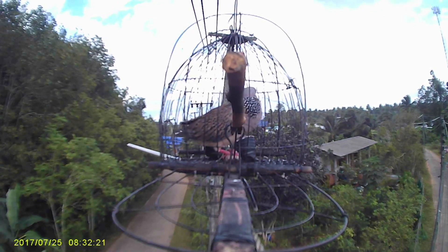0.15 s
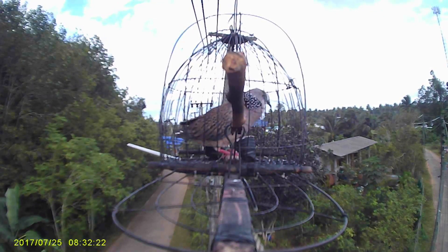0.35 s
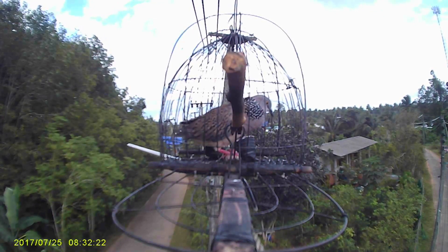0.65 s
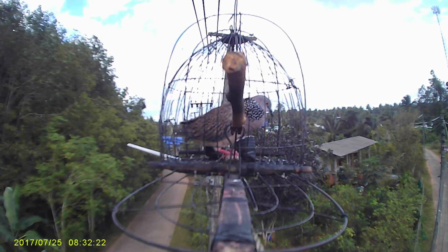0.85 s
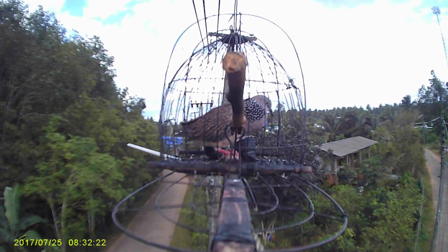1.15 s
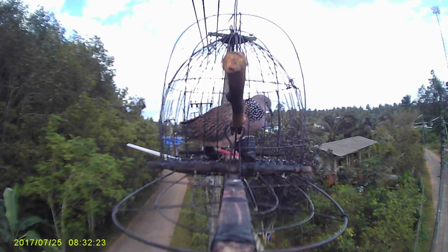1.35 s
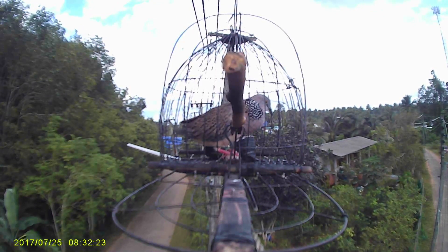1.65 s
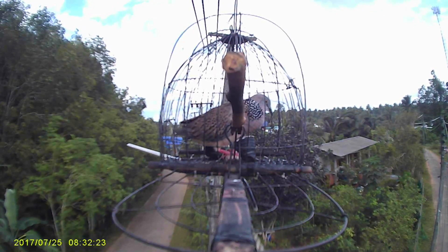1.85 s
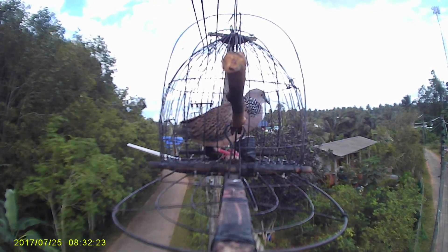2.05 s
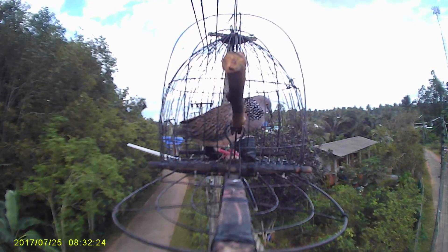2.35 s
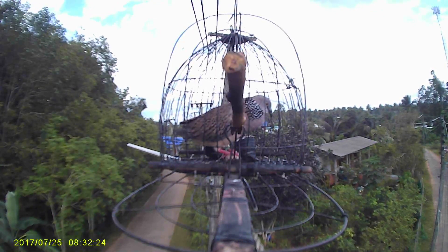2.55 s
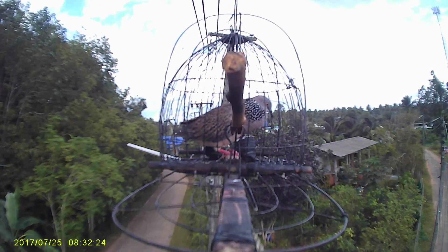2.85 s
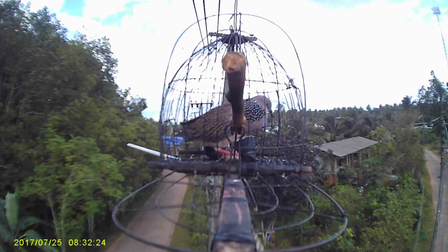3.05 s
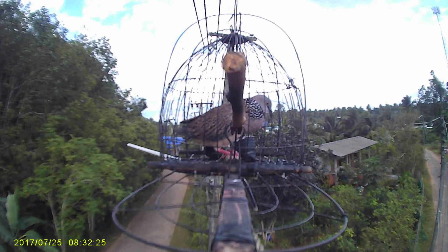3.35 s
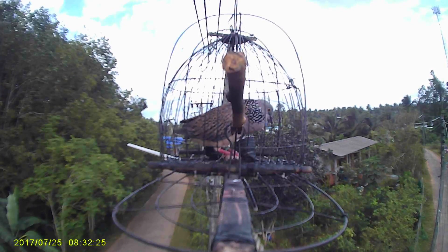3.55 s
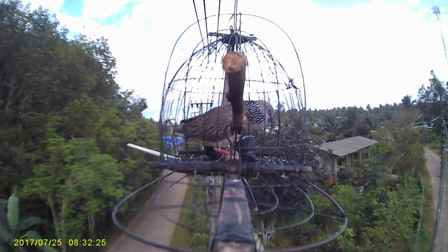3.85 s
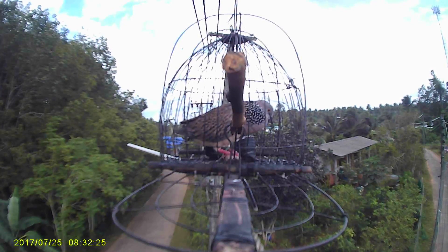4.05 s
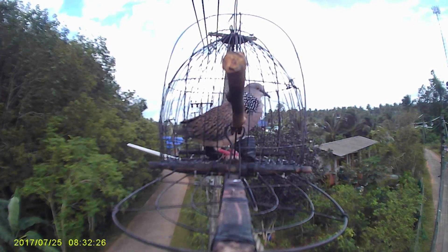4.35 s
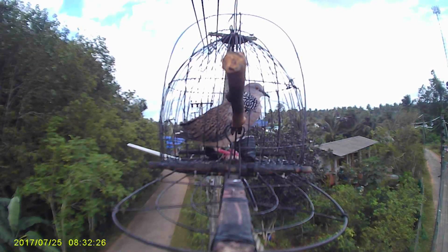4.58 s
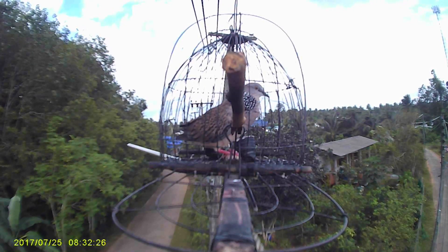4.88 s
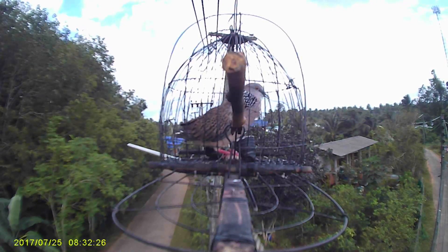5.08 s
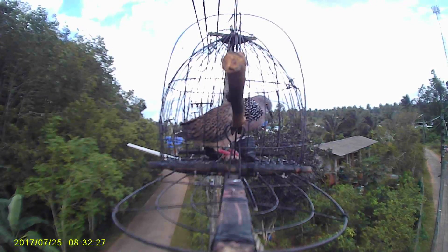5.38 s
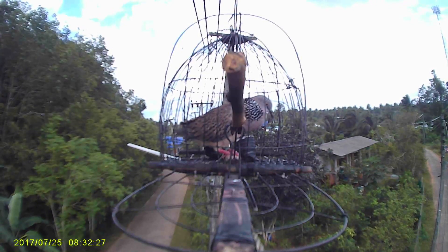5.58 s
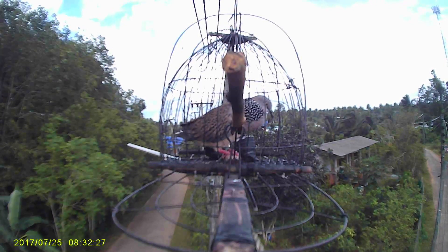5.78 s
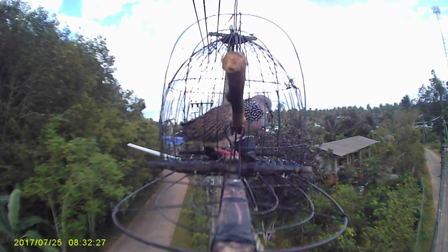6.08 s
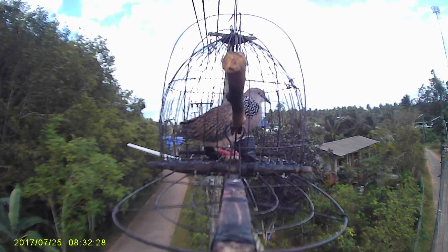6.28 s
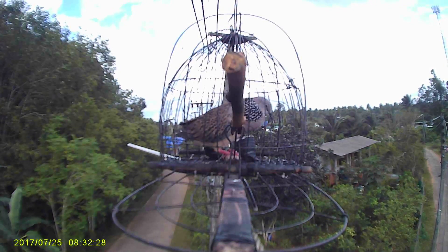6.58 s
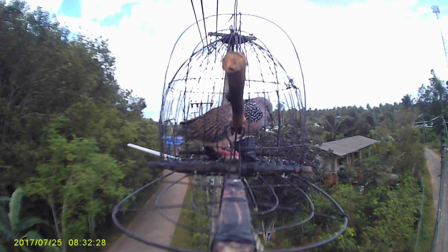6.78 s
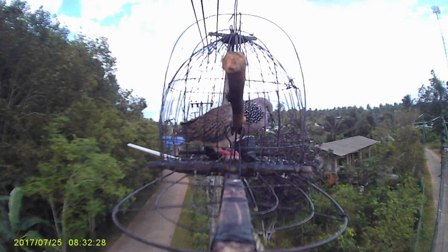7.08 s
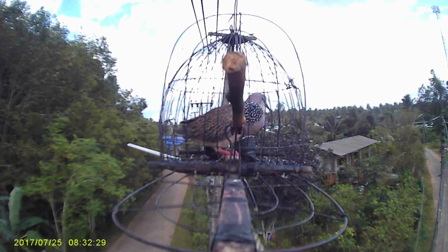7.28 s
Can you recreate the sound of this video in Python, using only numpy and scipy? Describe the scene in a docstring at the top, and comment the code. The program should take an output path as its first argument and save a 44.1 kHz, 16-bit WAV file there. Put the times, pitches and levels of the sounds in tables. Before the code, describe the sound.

A dove near the microphone coos again and again: a quick dipping double note, then a longer purring coo, mellow and low with a fluttering throb. Low wind rumble opens the scene, eases, swells around three seconds, then buffets almost constantly from nearly five seconds on. Behind are a steady outdoor hiss, a few faint bird whistles and a very thin high whine.

```python
"""Dove cooing in gusty wind

A spotted dove coos close by: a dipping double note, then a long purring one, with a faint echo.
Its near-pure tone flutters where the voice breaks between a low and a high register.
Gusts, made of shaped noise, buffet the microphone harder later on, with brief moans in a strong one.
Faint whistled calls of other birds, a steady outdoor hiss and a thin electronic whine lie behind."""
import sys
import numpy as np
from scipy import signal
from scipy.fft import rfft, irfft, next_fast_len
from scipy.io import wavfile
from scipy.ndimage import uniform_filter1d, map_coordinates

SR = 44100
rng = np.random.default_rng(int(sys.argv[2]) if len(sys.argv) > 2 else 0)


def int16_out(signal):
    """Quantize to a 16-bit WAV file."""
    q = np.round(np.clip(np.atleast_2d(signal).T, -1, 1) * 32767)
    wavfile.write(sys.argv[1], SR, q.astype(np.int16))


N = 327663
TIME = np.arange(N) / SR


def amp(db):
    """Decibels to gain."""
    return 10 ** (np.asarray(db) / 20)


def unit(x):
    """Scales to rms 1."""
    return x / np.sqrt(np.mean(x ** 2) + 1e-20)


def add(mix, start, sound):
    """Mixes a sound in at a time in seconds, which may lie before the start of the scene."""
    at = round(start * SR)
    sound = sound[max(-at, 0):]
    part = mix[max(at, 0):][:len(sound)]
    part += sound[:len(part)]


def drift(count, hz):
    """Smooth random wander up to about hz, cut from a scene-long one of rms 1."""
    f = np.fft.rfftfreq(N, 1 / SR)
    smooth = rfft(rng.standard_normal(N)) * np.exp(-(f / hz) ** 2)
    return unit(irfft(smooth, N))[:count]


def coloured(x, spectrum):
    """Filters by a spectrum given as (Hz, dB) points."""
    hz, db = np.transpose(spectrum)
    size = next_fast_len(len(x) + 2048)
    log_hz = np.log(np.fft.rfftfreq(size, 1 / SR) + 1)
    gain = amp(np.interp(log_hz, np.log(hz), db, right=-120))
    return irfft(rfft(x, size) * gain, size)[:len(x)]


def noise(spectrum):
    """Coloured noise of rms 1."""
    return unit(coloured(rng.standard_normal(N), spectrum))


def steadied(x, seconds):
    """Evens out swells slower than the given time."""
    power = uniform_filter1d(x ** 2, int(seconds * SR))
    return x / np.sqrt(abs(power) + 1e-6)


def gate(t, start, end, edge_s):
    """1 from start to end, 0 outside, with smooth edges centred on those times."""
    ramp = np.minimum(t - start, end - t) / edge_s + .5
    return np.sin(np.pi / 2 * np.clip(ramp, 0, 1)) ** 2


def dove(echo_db=-29, echo_t60=1.0):
    """The double and purring notes, and their faint scatter from the trees as a decaying noise echo."""
    # Each row: start in s, length in s, sag between the syllables in dB, high-register time of the
    # first syllable in s and of the second in s, effort of the second in dB, mean flutters per s.
    double_notes = [(.772, 0.23, 11.5, 0.048, 0.031, -15, 74), (2.618, .27, 17, 0.049, .048, -14.5, 84),
                    (3.854, 0.19, 10, 0.031, 0, -16, 91), (5.535, .266, 17, .042, 0.0351, -15, 88.5),
                    (6.865, .199, 8, 0.036, 0.0023, -17, 82)]
    # Each row: start in s, length in s, level in dB before the arch, reference pitch in Hz at the top,
    # delay before the voice steadies in s, length of the steady part in s, mean flutters per s.
    purrs = [(-.21, .41, -16.3, 666, 0.13, 0.14, 59.4), (1.128, 0.39, -16.5, 662.4, .112, 0.14, 57.4),
             (3.026, .404, -16.5, 659.6, .176, .016, 60), (4.174, 0.36, -17.5, 652.6, 0.078, 0.0557, 60),
             (5.946, 0.38, -17.5, 658.7, .148, .11, 58.24), (7.196, 0.41, -18, 665, 0.067, 0.098, 67.6)]
    voice = np.zeros(N)
    for start, *note in double_notes:
        add(voice, start, double_note(*note))
    for start, *note in purrs:
        add(voice, start, purr(start, *note))
    t = TIME[:SR]
    tail = rng.standard_normal(len(t)) * amp(-60 * t / echo_t60)
    echo = signal.fftconvolve(voice, tail / np.linalg.norm(tail))[:N]
    return voice + amp(echo_db) * echo


def double_note(length, sag_db, first_s, second_s, second_db, flutter_rate, up_s=0.01353, let_go_s=0.01055):
    """A hoot in the high register, a low murmur, and a swell that may jump up again; pitch follows effort."""
    hoot_db, quiet_db = -16, -36  # effort of the first syllable, and at the note's two ends
    hoot_s, sag_s = .064, 0.0113  # how long the hoot is held, and the time constant of the sag
    swell_s, second_share = 0.0713, .2  # rise time, and the share of the note held at the second's effort
    onset_s, stop_s = 0.014, .016
    low_hz, hz_per_db = 523, 6.5  # low register: pitch at the hoot's effort, and its rise with effort
    jump_hz, jump_s, high_loss_db = 146.3, .028, 3  # high register: how far up, how fast, how much softer
    second_jump = 0.86  # share of that jump which the second syllable makes
    flip_db = 2  # lift while crossing between the registers
    low_flutter, high_flutter, flutter_per_db = 0.84, 0.048, 0.1  # depths; the low one grows with effort

    t = np.arange(0, length, 1 / SR)
    sag = 1 - np.exp(-np.maximum(t - hoot_s, 0) / sag_s)
    swell = np.clip(1 + (t - length * (1 - second_share)) / swell_s, 0, 1)
    effort_db = (hoot_db - sag_db * sag) * (1 - swell) + second_db * swell
    ends = np.clip(np.minimum(t / onset_s, (length - t) / stop_s), 0, 1)
    effort_db = quiet_db + (effort_db - quiet_db) * ends

    high = gate(t, up_s, up_s + first_s, jump_s)  # 0 in the low register, 1 in the high one
    if second_s > 0:
        second_end = length - let_go_s
        high = high + second_jump * gate(t, second_end - second_s, second_end, jump_s)

    extra_db = effort_db - hoot_db
    hz = low_hz + hz_per_db * extra_db + jump_hz * high
    level_db = effort_db - high_loss_db * high + flip_db * np.sin(np.pi * high) ** 2
    low_depth = low_flutter + flutter_per_db * extra_db
    depth = high_flutter + (low_depth - high_flutter) * (1 - high) ** 2
    return coo(hz, level_db, depth, flutter_rate)


def purr(start, length, db, top_hz, delay_s, steady_s, flutter_rate, release_s=0.023, release_db=7):
    """A long arch that flutters, holds steady for a while, perhaps cracks, and flutters again as it sinks."""
    # The arch all purrs share. Each row: time into the note in s, pitch as a share of the top,
    # level in dB, flutter depth (0 none, 1 full).
    purr_arch = [(0, 0.742, -9.5, 0.19), (.015, .85, -2.5, 0.71), (.036, 0.95, 0.3, 1.1),
                 (.09, .99, -0.5, 0.92), (.135, 0.96, -0.5, 0.88), (0.202, .92, 0.5, 0.6),
                 (0.254, .835, 2.5, 0.73), (.3, .765, -1.5, 0.53), (.36, .69, -10, 0.08),
                 (.4, 0.585, -16, 0.25)]
    # The voice flips briefly to the other register.
    # Each row: centre time in the scene in s, length in s, pitch step in Hz.
    cracks = [(.02, 0.021, -89), (1.329, 0.022, -100), (3.251, 0.017, 26), (3.269, 0.019, -35),
              (3.293, 0.021, 33.5), (4.404, 0.027, 42), (6.109, 0.023, -89)]
    crack_db_per_hz = 0.0373  # the low register is louder
    hold_up = .6  # settling in the high register holds back this share of the fall in pitch
    settle_s, steady_depth = .014, .14  # edge time, and flutter depth while steady

    t = np.arange(0, length, 1 / SR)
    s, *columns = np.transpose(purr_arch)
    share, arch_db, depth = (np.interp(t, s, c) for c in columns)
    steady = gate(t, delay_s, delay_s + steady_s, settle_s)
    hz = top_hz * (share + hold_up * (1 - share) * steady)
    level_db = db + arch_db - release_db * np.clip(1 - (length - t) / release_s, 0, 1)
    for at, crack_s, step_hz in cracks:
        flip = gate(start + t, at - crack_s / 2, at + crack_s / 2, settle_s)
        hz = hz + step_hz * flip
        level_db = level_db - crack_db_per_hz * step_hz * flip
        steady = np.maximum(steady, flip)
    return coo(hz, level_db, depth + (steady_depth - depth) * steady, flutter_rate)


def coo(hz, level_db, depth, flutter_rate, sweep_hz=98, lead=0.67, dip=0.81, jitter=0.086, uneven=0.29,
        waver=0.0168, octave_db=-42):
    """One note: in each flutter the tone slides up, chokes, and falls back to start again."""
    # Resonance of the inflated throat. Each row: frequency in Hz, gain in dB.
    throat = [(250, -21), (380, -3.5), (450, -6), (510, 4), (580, 0.5), (690, -1.5), (760, -6), (850, -20),
              (1100, -34)]
    count = len(hz)
    depth = np.clip(depth * (1 + uneven * drift(count, 50)), 0, 1.2)
    cycle = 2 * np.pi * np.cumsum(flutter_rate * (1 + jitter * drift(count, 40))) / SR
    # slow rise, quick fall just before the choke
    slide = -np.sin(cycle + lead) - np.sin(2 * (cycle + lead)) / 2
    pitch = hz * (1 + waver * drift(count, 240)) + sweep_hz * depth * slide
    choke = ((1 + np.cos(cycle)) / 2) ** 2
    syrinx = (1 - dip * depth * choke) * np.sin(2 * np.pi * np.cumsum(pitch) / SR)
    tone = steadied(coloured(syrinx, throat), 1 / flutter_rate)
    octave = (signal.hilbert(tone) ** 2).real  # the closed beak lets few overtones out
    ends = signal.windows.tukey(count, .03)
    return amp(level_db) * (tone + amp(octave_db) * octave) * ends


def wind(rumble_db=-1, eddy_db=-1, lumps_db=2.0, surge=.07, buffet_db=.8, buffet_hz=14):
    """Pressure swings on the microphone port, with finer eddies that brighten as the air speeds up."""
    # Slow pressure swings. Each row: frequency in Hz, relative density in dB per Hz.
    rumble_spectrum = [(4, -7), (12, -12), (25, 2), (45, -1.5), (80, -6.5), (125, -12.5), (180, -25.5),
                       (300, -42), (600, -76)]
    # Finer eddies at air speed 1. Each row: frequency in Hz, relative density in dB per Hz.
    eddy_spectrum = [(45, -4), (75, -11), (125, 0.5), (240, -1), (340, -7.5), (450, -18.5), (620, -27.5),
                     (1000, -33.5), (2000, -79), (5000, -81)]
    rumble_gain, eddy_gain, speed = airflow()
    buffet = buffet_db * drift(N, buffet_hz)
    rumble = steadied(noise(rumble_spectrum), 0.0796) * rumble_gain * amp(rumble_db + buffet)

    lumps = drift(N, 35.25)  # each lump of air is both louder and faster
    travelled = np.cumsum(speed * np.exp(surge * lumps))
    # frozen turbulence carried past the port
    eddies = map_coordinates(noise(eddy_spectrum), [travelled], order=3, mode="wrap")
    eddies = steadied(eddies * amp(lumps_db * lumps), .06)
    return rumble + eddies * eddy_gain * amp(eddy_db + buffet)


def airflow():
    """Gusts build quickly and die more slowly on top of the breeze: rumble gain, eddy gain and air speed."""
    # Each row: peak time in s, length scale in s, rumble in dB and eddies in dB before the wind's trims,
    # air speed as a factor on the eddies' frequencies.
    gusts = [(.01, .1, -10, -20.5, 0.78), (0.154, 0.1, -15.5, -27, 0.87), (0.266, 0.079, -10.5, -32, 1),
             (.345, 0.057, -12.5, -24, 1.11), (.62, .05, -20.5, -39.5, .9), (0.725, .12, -14, -28, 0.81),
             (.825, .06, -24.5, -30, 0.83), (1.346, 0.16, -15, -36.5, 0.88), (1.785, .07, -24.5, -42, 0.76),
             (2.923, 0.12, -13.5, -26, 0.9), (3.062, 0.079, -9, -22, 0.96), (3.201, .14, -13, -19.5, 1.03),
             (3.365, .07, -7, -19, .82), (3.483, 0.11, -12, -24.5, 0.94), (3.575, .1, -5.5, -19, 1.15),
             (3.91, .19, -16.5, -31, 0.86), (4.865, .12, -5, -15.5, 1.2), (4.97, .19, -13.5, -20, 1.42),
             (5.09, .14, -11.5, -21, 1.27), (5.184, 0.058, -9, -17, 0.72), (5.31, .16, -14, -33, 0.87),
             (5.438, 0.14, -12.5, -19.5, 0.92), (5.579, 0.097, -10.5, -21, 1.15),
             (5.694, 0.096, -9, -18.5, .9), (5.785, 0.058, -11.5, -17, .88),
             (5.961, 0.16, -14.5, -22.5, 0.91), (6.139, 0.16, -10.5, -21.5, 1.22),
             (6.318, 0.16, -10, -24, .97), (6.412, 0.092, -12.5, -26, .95),
             (6.616, 0.14, -17.5, -22.5, 0.98), (6.776, .12, -10, -30, 0.86), (6.889, 0.16, -9, -19, 1.08),
             (7.02, .11, -7, -20, 1.14), (7.209, .1, -9.5, -19, 1.23), (7.379, 0.14, -10.5, -18.5, 1.26)]
    # Wind between gusts. Each row: time in s, rumble strength in dB before the wind's trim.
    breeze = [(0, -23), (.38, -24), (.48, -30.5), (.85, -27.5), (1.45, -27), (1.62, -32), (2.05, -27.5),
              (2.4, -30.5), (2.8, -28.5), (2.95, -23), (3.3, -22), (3.65, -21), (3.72, -30), (4.3, -29.5),
              (4.79, -30.5), (4.85, -19.5), (6.55, -20.5), (7.43, -15.5)]
    breeze_eddy_db, breeze_speed = -9, .88  # eddies relative to its rumble; its air speed factor
    rise = .36  # share of a gust's length spent building up

    t = TIME[::64]
    rumble_power = amp(np.interp(t, *np.transpose(breeze))) ** 2
    eddy_power = rumble_power * amp(breeze_eddy_db) ** 2
    push = eddy_power * breeze_speed  # speed weighted by eddy power
    for peak, length, rumble_db, eddy_db, speed in gusts:
        side_s = length * np.where(t < peak, rise, 1 - rise)
        swell = np.exp(-((t - peak) / side_s) ** 2)
        stir = (amp(eddy_db) * swell) ** 2
        rumble_power = rumble_power + (amp(rumble_db) * swell) ** 2
        eddy_power = eddy_power + stir
        push = push + speed * stir
    curves = np.sqrt(rumble_power), np.sqrt(eddy_power), push / eddy_power
    return [np.interp(TIME, t, c) for c in curves]


def moans(width_hz=35):
    """Short low swells of noise in a strong gust, each in one narrow resonance."""
    # Each row: start in s, length in s, pitch in Hz, level in dB before the swell shape.
    moan_list = [(4.973, 0.048, 437, -26), (5.047, 0.11, 424, -25)]
    out = np.zeros(N)
    for start, length, hz, db in moan_list:
        t = TIME[:int(length * SR)]
        wander = drift(len(t), width_hz) + 1j * drift(len(t), width_hz)
        band = wander * np.exp(2j * np.pi * hz * t)
        add(out, start, amp(db) * unit(band.real) * np.sin(np.pi * t / length))
    return out


def far_calls(arch=0.0517, waver=0.0214):
    """Other birds' faint whistles, which rise and fall a little in pitch as they swell and fade."""
    # Each row: start in s, length in s, peak pitch in Hz before the waver, rms level in dB at the peak.
    calls = [(1.852, 0.27, 797, -43.5), (2.738, 0.13, 1680, -51), (4.132, 0.054, 2086, -40)]
    out = np.zeros(N)
    for start, length, hz, db in calls:
        swell = np.sin(np.linspace(0, np.pi, int(length * SR)))
        pitch = hz * (1 + arch * (swell - 1) + waver * drift(len(swell), 61))
        whistle = np.sin(2 * np.pi * np.cumsum(pitch) / SR)
        add(out, start, np.sqrt(2) * amp(db) * np.sqrt(abs(swell)) * whistle)
    return out


def background(air_db=6, fizz_db=0):
    """Outdoor hiss as two layers of shaped noise with slowly changing levels."""
    # Low hiss. Each row: frequency in Hz, relative density in dB per Hz.
    air_spectrum = [(100, -2), (400, -0.5), (750, -2), (1080, -2.5), (1280, -9.5), (1480, -13.5),
                    (1800, -7), (2100, -5), (2500, -10.5), (3000, -16.5), (3700, -25), (5000, -41)]
    # High hiss. Each row: frequency in Hz, relative density in dB per Hz.
    fizz_spectrum = [(2800, -14), (3800, -14.5), (4450, -5), (5100, -11), (5700, -3), (6750, 0),
                     (7400, -5.5), (8500, -12.5), (9500, -13), (10700, -17.5), (13500, -16.5), (14800, -18),
                     (15700, -26)]
    # Each row: time in s, low hiss in dB before the air_db lift, high hiss in dB before fizz_db.
    hiss = [(0, -42.5, -47), (2.5, -43.5, -48), (7.43, -43.5, -49)]
    s, low_db, high_db = np.transpose(hiss)
    air = noise(air_spectrum) * amp(np.interp(TIME, s, low_db) + air_db)
    fizz = noise(fizz_spectrum) * amp(np.interp(TIME, s, high_db) + fizz_db)
    return air + fizz


def whine(hz=11200, level_db=-68.3):
    """A thin electronic sine tone, broken briefly 25 times a second."""
    running = uniform_filter1d(1. * (TIME * 25 % 1 < .75), 60)  # on for 3/4 of each cycle, edges softened
    return np.sqrt(2) * amp(level_db) * running * np.sin(2 * np.pi * hz * TIME)


def scene():
    """Dove, wind and surroundings at one microphone."""
    return (dove() + wind() + moans() + far_calls() + background() + whine())[None]


def record(dry, offset=0.032, edge_hz=15700):
    """The input sits slightly off zero and rounds the largest gusts; then a low-pass limits the band."""
    x = dry + offset
    rounded = x / (1 + x ** 8) ** (1 / 8)
    low_pass = signal.firwin(511, edge_hz, window=("kaiser", 9), fs=SR)
    return signal.oaconvolve(rounded, low_pass[None], "same")


dry = scene()
out = record(dry)
int16_out(out)
```